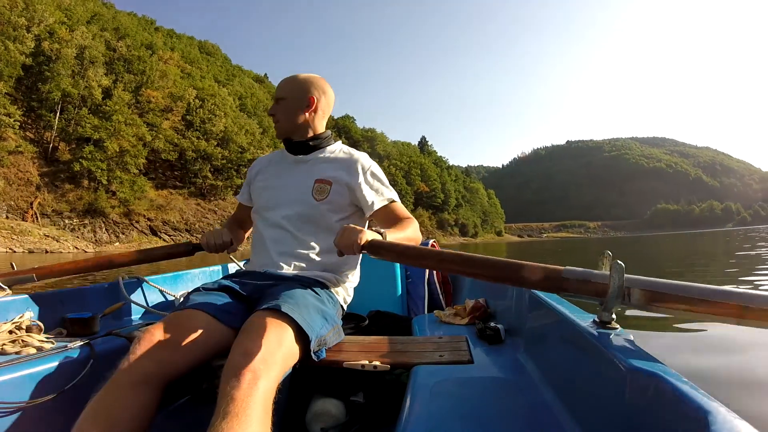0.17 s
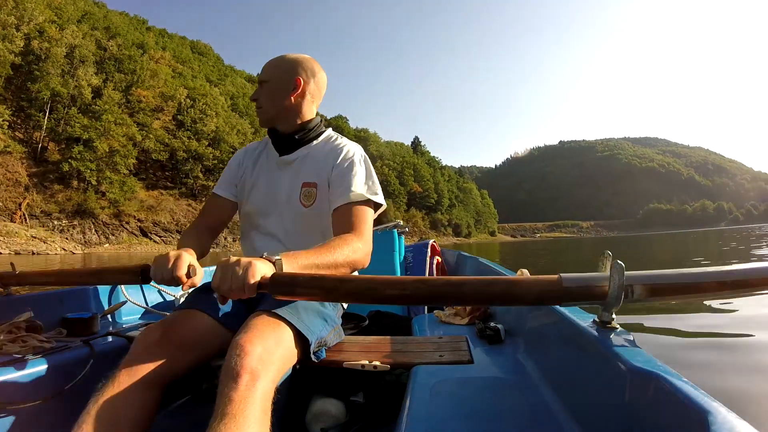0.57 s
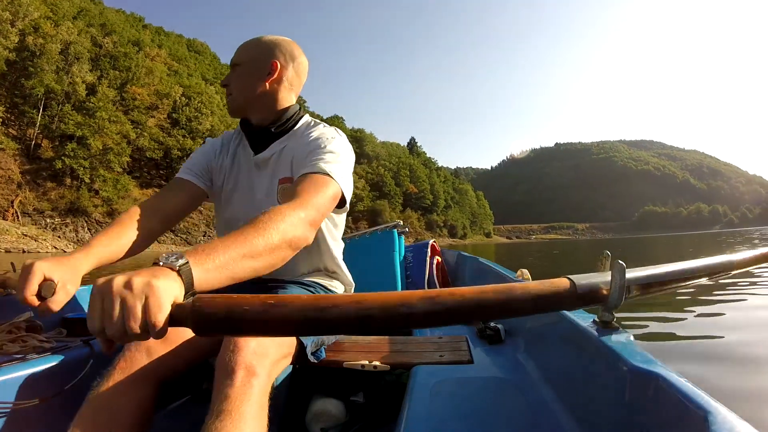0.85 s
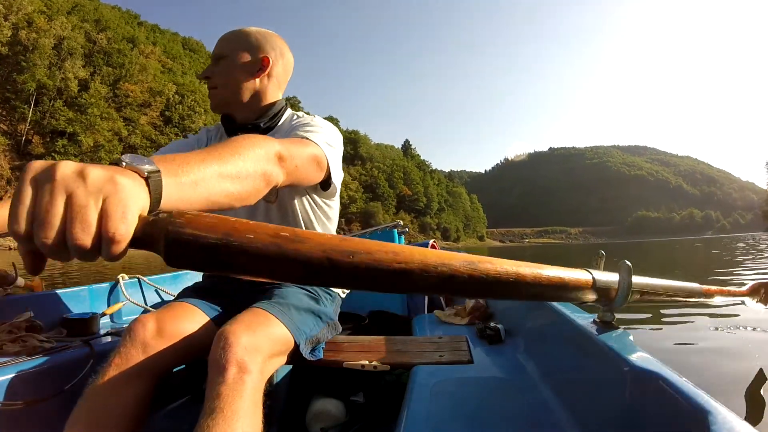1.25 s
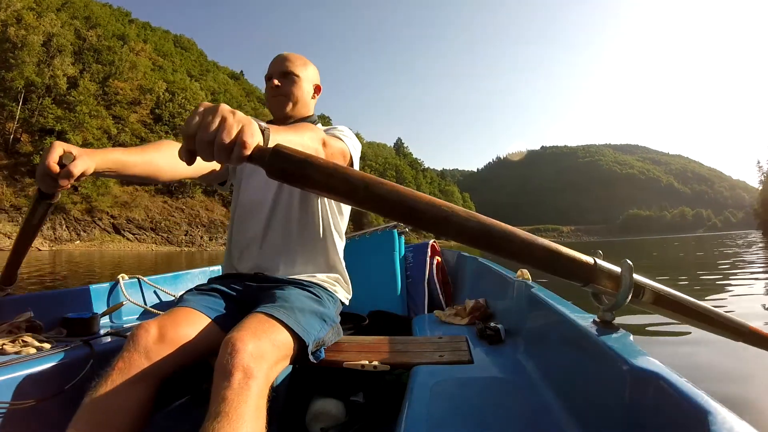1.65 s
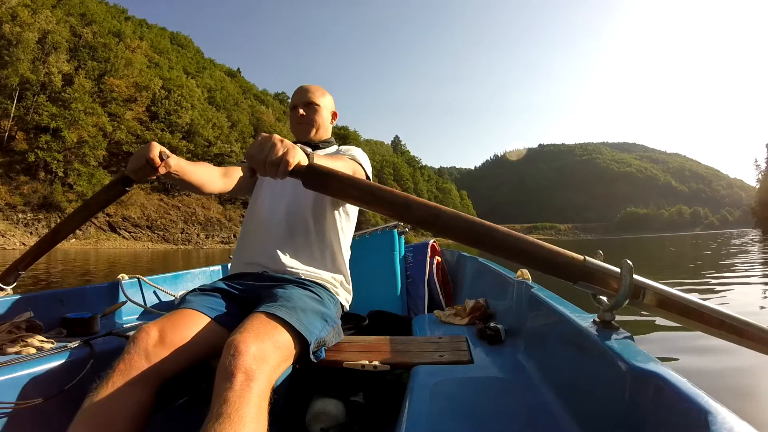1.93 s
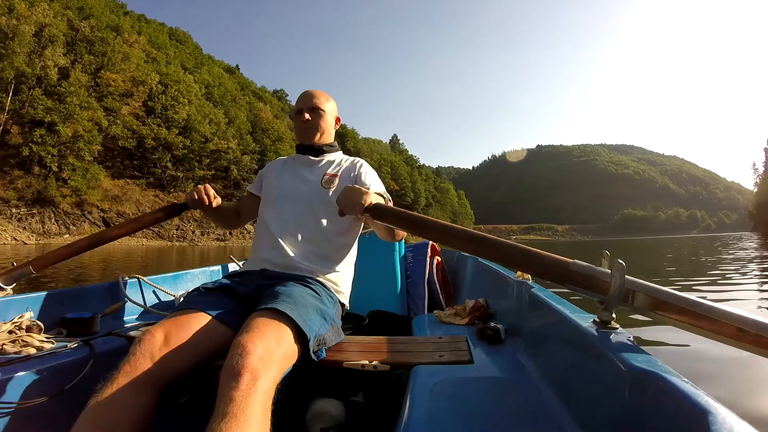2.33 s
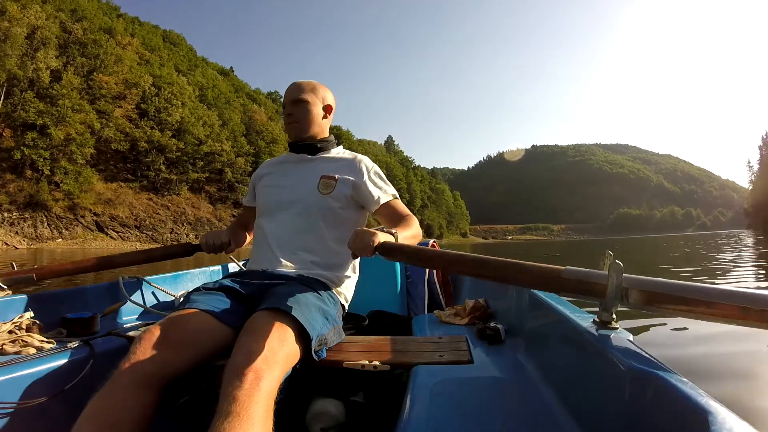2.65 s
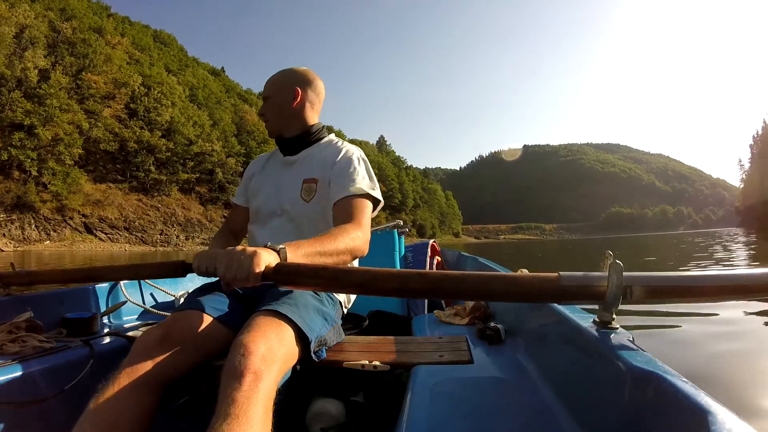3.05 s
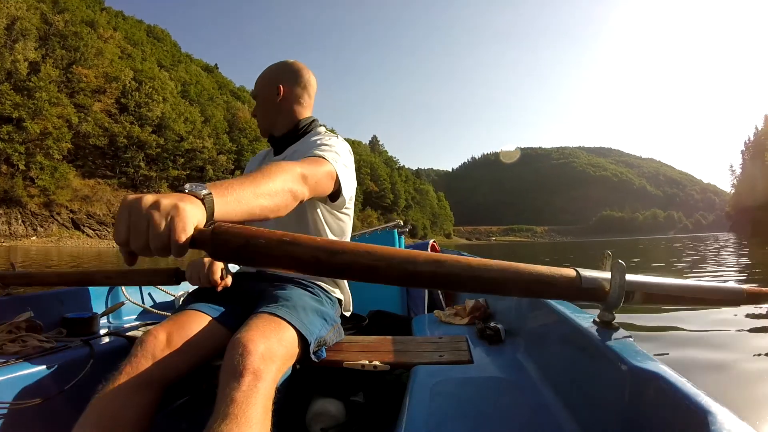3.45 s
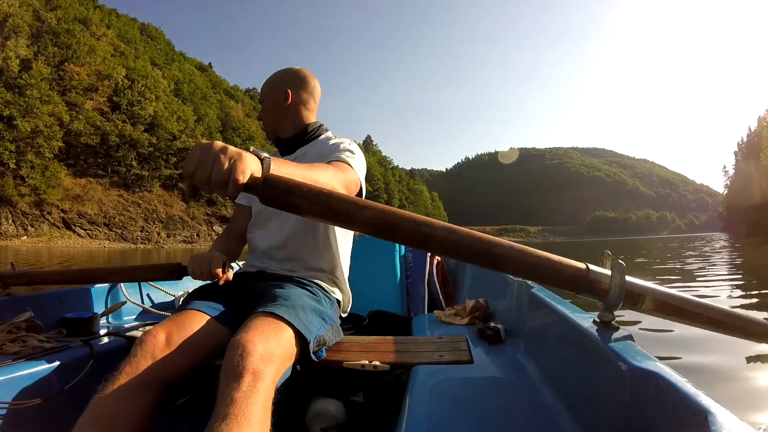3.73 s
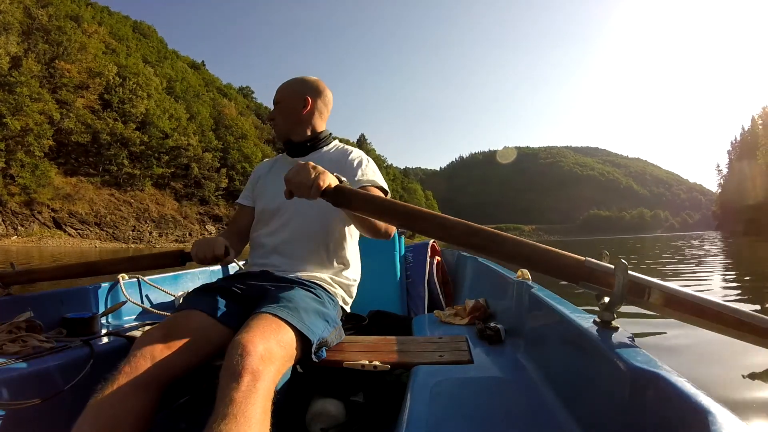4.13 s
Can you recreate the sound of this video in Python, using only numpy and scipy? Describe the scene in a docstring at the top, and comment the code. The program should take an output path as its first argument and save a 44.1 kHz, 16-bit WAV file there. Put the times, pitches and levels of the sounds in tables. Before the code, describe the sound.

Heard from inside a closed case fixed to a small boat on a calm lake: oars knock and rub in their rowlocks while bright drops fall. Knocks swell to heavy hollow thumps just before two seconds, a brief juddering groan follows, then blades swirl the water with bubbles and gulps. After a lull, softer knocks return with a few drops and a tiny metal squeak, over steady low rumble and faint hiss.

```python
"""Rowing a small dinghy on a calm lake, heard inside a closed case fixed to the hull.
Oars knock and rub in their rowlocks while drops fall; the knocks, which ring the hull modes, swell.
Just after 2 s the oar groans in stick-slip jolts, then the blades swirl: noise bands and bubbles.
After a lull, softer knocks return with drops and a faint metal squeak, a bent whistle.
The case's resonances colour all this, over a steady rumble and hiss."""
import sys
import numpy as np
from scipy import signal
from scipy.fft import rfft, irfft, next_fast_len
from scipy.io import wavfile
from scipy.ndimage import map_coordinates

SR = 44100
rng = np.random.default_rng(int(sys.argv[2]) if len(sys.argv) > 2 else 0)


def transcribe(signal):
    """Save signal, clipped to [-1, 1], as a 16-bit WAV file at the path in sys.argv[1]."""
    frames = np.atleast_2d(signal).T
    limited = np.clip(frames, -1, 1)
    pcm = np.round(limited * 32767).astype(np.int16)
    wavfile.write(sys.argv[1], SR, pcm)


N = 188764  # samples in the scene


def amp(db):
    """Gain of a level in dB."""
    return 10 ** (np.asarray(db) / 20)


def unit(x):
    """Scale to rms 1."""
    return x / np.sqrt(np.mean(x ** 2) + 1e-20)


def noise():
    """White noise for the whole scene."""
    return rng.standard_normal(N)


def along(points, hz):
    """Read a curve of (f/Hz, value) points on a log frequency axis."""
    f, value = np.transpose(points)
    return np.interp(np.log(hz + 1), np.log(f + 1), value)


def wobble(rate):
    """A smooth random curve with this many knots a second."""
    knots = rng.standard_normal(int(N * rate / SR) + 4)
    return map_coordinates(knots, [np.arange(N) * rate / SR])


def filtered(x, response):
    """Apply a complex response of frequency."""
    m = next_fast_len(N + SR // 2)
    spectrum = rfft(x, m) * response(np.fft.rfftfreq(m, 1 / SR))
    return irfft(spectrum, m)[..., :N]


def band(x, lo_hz, hi_hz):
    """A causal band-pass."""
    return signal.sosfilt(signal.butter(2, [lo_hz, hi_hz], "band", fs=SR, output="sos"), x)


def swells(start, end, peak_db, rise, fall, rest_db):
    """Level in dB: swells climb, hold and fall at steady dB/s; their powers add over a resting level."""
    t = np.arange(N)[:, None] / SR
    before, after = np.clip(start - t, 0, None), np.clip(t - end, 0, None)
    db = peak_db - rise * before - fall * after
    return 10 * np.log10(np.sum(amp(2 * db), axis=1) + amp(2 * rest_db))


# Ringing modes of the hull: f/Hz, relative level/dB, decay by 60 dB t60/s
HULL_MODES = [(44, -4, 0.16), (64.2, -16, 1), (93.9, 2, 0.21), (139.9, 0, .14), (172.6, -1, 0.14),
              (227.7, -2, 0.14), (280, 0.5, 0.12), (333.4, -3, 0.21), (376.3, -4, 0.14), (443.7, -1, 0.083),
              (512, -4.5, 0.13), (624, -13.5, 0.11), (678, -18, 0.26), (743.7, -2, 0.052),
              (828.8, -6, 0.15), (937.3, 1.5, 0.046), (1160, -17.5, 0.06)]


def hull(force, lo_hz, hi_hz):
    """The planks ring under a force in the modes of one range; neighbours start in opposite phase."""
    t = np.arange(SR // 3) / SR
    ring = np.zeros(len(t))
    for k, (hz, db, t60) in enumerate(HULL_MODES):
        if lo_hz <= hz < hi_hz:
            ring += (-1) ** k * amp(db - 60 * t / t60) * np.sin(2 * np.pi * hz * t)
    return signal.fftconvolve(force, ring / np.linalg.norm(ring))[:N]


# Oar knocks, levels before the final trim:
# t/s, boom level/dB, boom centre f/Hz, wood level/dB, crack level/dB
OAR_KNOCKS = [(0.004, -21.5, 162, -22.5, -62), (0.042, -35, 102, -31, -32),
              (0.094, -17.5, 168, -19.5, -39.5), (0.16, -30, 84, -22, -43), (0.251, -34, 150, -25, -62),
              (0.378, -41, 81, -28.5, -60), (0.75, -46, 60, -55, -75), (0.909, -27.5, 213, -35, -74),
              (0.947, -30, 298, -26, -50), (0.989, -33, 126, -35, -62), (1.096, -14, 280, -15.5, -42),
              (1.124, -17, 87.5, -29, -55), (1.162, -22.5, 173, -24.5, -42), (1.189, -22, 107, -33, -63),
              (1.448, -44, 126, -27, -77), (1.485, -34, 196, -29, -72), (1.699, -25.5, 122, -30.5, -46),
              (1.751, -20.5, 103, -23, -45), (1.778, -6.5, 246, -8.5, -20), (1.793, -5, 100, -17.5, -65),
              (1.86, -24, 119, -31, -25), (1.944, -25, 120, -34.5, -32), (2.074, -7, 228, -13.5, -29),
              (2.277, -51, 100, -19.5, -64), (2.289, -38, 297, -16, -28), (2.314, -19, 118, -15, -61),
              (2.336, -14.5, 152, -16, -25.5), (2.39, -24.5, 149, -52, -24.5), (2.419, -25, 88, -21, -48),
              (2.453, -12, 182, -24, -34), (2.489, -18.5, 83, -12, -38.5), (2.534, -17.5, 225, -34, -50),
              (2.613, -27, 280, -45, -43), (2.647, -17.5, 275, -25, -32), (2.7, -23.5, 200, -30, -37),
              (3.0, -57, 170, -35, -57), (3.051, -52, 70, -27, -49), (3.321, -28, 200, -40, -53),
              (3.344, -26, 116, -59, -72), (3.388, -19, 198, -36, -59), (3.412, -19.5, 111, -28.5, -48.5),
              (3.439, -26, 97, -33, -58), (3.488, -24, 88, -43, -55), (3.69, -58, 78, -35, -52),
              (3.9, -28, 182, -34.5, -70.5), (3.967, -35, 90, -26.5, -47), (3.995, -20, 270, -24, -44.5),
              (4.011, -18.5, 93, -43, -60), (4.035, -28.5, 91, -42, -50), (4.208, -14.5, 167, -22, -43.5),
              (4.247, -18, 95, -25, -57)]
BOOM_DB_PER_OCTAVE = 12.5  # fall of the low modes away from the boom centre
PLANK_DB = -3  # middle modes, against the mean of boom and wood


def knocks():
    """Each contact is a short rattle of blows: it rings the hull modes at new strengths and cracks."""
    out, t = np.zeros(N + SR), np.arange(SR // 3) / SR
    hz, db, t60 = np.transpose(HULL_MODES)[:, :, None]
    for s, boom_db, boom_hz, wood_db, crack_db in OAR_KNOCKS:
        rattle = np.abs(np.exp(-t[:1500] / 0.0037) * rng.standard_normal(1500) ** 3)
        # the place of the blow favours the low modes near one pitch
        low_db = boom_db - BOOM_DB_PER_OCTAVE * np.abs(np.log2(hz / boom_hz))
        middle_db = (low_db + wood_db) / 2 + PLANK_DB
        level_db = np.where(hz < 300, low_db, np.where(hz < 600, middle_db, wood_db))
        uneven_db = 2 * rng.standard_normal(hz.shape)
        swing = (-1) ** np.arange(len(hz))[:, None] * amp(level_db + db + uneven_db)
        onset = 1 - np.exp(-t * hz * 2.4)
        modes = swing * amp(-60 * t / t60) * np.sin(2 * np.pi * hz * t) * onset
        ring = np.sum(modes, axis=0)
        body = 1.5 * signal.fftconvolve(ring, rattle / np.sum(rattle))[:len(t)]
        # a hard, bright contact is over sooner than a dull one
        crack_t60 = np.clip(0.025 + 0.003 * (wood_db - crack_db), .015, .08)
        crack_envelope = amp(crack_db - 60 * t / crack_t60) * (1 - np.exp(-t / 0.0014))
        crack = 3.93 * band(rng.standard_normal(len(t)), 810, 3300) * crack_envelope
        out[round(s * SR):][:len(t)] += body + crack
    return out[:N]


# The loaded oar slipping in its rowlock: t/s, slip rate f/Hz, level/dB (boom drive before the mix)
OAR_SLIPS = [(2.093, 235, -11.5), (2.107, 182, -0.5), (2.112, 250, -41), (2.118, 239, -11),
             (2.127, 202, -9), (2.134, 172, -8), (2.15, 166, -10.5), (2.174, 195, -19.5), (2.179, 138, -42)]
GROAN_WOOD_DB, WOOD_DB_PER_S = -20, 60  # the ring of the wood swells: drive at the start, climb
BITE_DB, BITE_DB_PER_S = -7, -100  # the metal's bite fades: level at the start before trim, slope


def groan():
    """Stick and slip: one jolt a slip, uneven in time and size, booming in the hull, biting in the metal."""
    times, rates, levels = np.transpose(OAR_SLIPS)
    t = np.arange(N) / SR
    rate, db = np.interp(t, times, rates), np.interp(t, times, levels)
    since = t - times[0]
    uneven_rate = rate * (1 + .03 * wobble(150)) * (since > 0)
    slips = np.diff(np.floor(np.cumsum(uneven_rate) / SR + .8), prepend=0)
    jolts = slips * amp(1.5 * noise())
    # between slips the wood keeps scraping
    force = jolts * np.sqrt(SR / rate) + .18 * noise()
    load = (t > times[0] - .002) * (t < times[-1])
    boom = hull(load * amp(db) * force, 150, 600)
    wood = hull(load * amp(GROAN_WOOD_DB + WOOD_DB_PER_S * since) * force, 600, 1200)
    # every slip frees a puff of grit a few milliseconds long
    puff = signal.lfilter([1], [1, -np.exp(-1 / (0.0041 * SR))], jolts)
    # a few milliseconds of smoothing keep the bite from switching on and off abruptly
    fading = signal.lfilter([.006], [1, -.994], load * amp(BITE_DB + BITE_DB_PER_S * since))

    def bite_colour(hz):
        """Gritty colour, strongest from about 2 to 4 kHz."""
        points = [(900, -15.5), (1800, -7.5), (3500, -5.5), (7000, -21.5), (12000, -50.5)]
        return amp(along(points, hz))

    bite = 1.96 * fading * filtered(puff * noise(), bite_colour)
    return .5 * boom + .5 * wood + bite


# Turns of the oars in the rowlocks: t/s of peak, boom level/dB, plank level/dB
OAR_RUBS = [(0.01, -38, -52), (0.14, -35, -39.5), (0.26, -45, -49.5), (0.622, -59, -53.5),
            (0.962, -36, -41.5), (1.119, -29, -42.5), (1.491, -38.5, -50), (1.68, -41, -52),
            (1.841, -31.5, -39), (1.92, -40.5, -51), (1.99, -53, -46.5), (2.171, -28, -35),
            (2.25, -49, -34), (2.33, -27.5, -47), (2.57, -31.5, -39.5), (2.7, -40, -43.5), (3.0, -66, -55),
            (3.35, -42, -56), (3.459, -35.5, -50), (3.56, -57, -80), (3.78, -47, -58), (3.998, -34, -44),
            (4.13, -46, -69), (4.27, -56, -45)]
RUB_RISE_DB_PER_S, RUB_FALL_DB_PER_S = 262, 136
BOOM_REST_DB, PLANK_REST_DB = -65.5, -67


def rubbing():
    """Wood drags on metal in uneven lumps and the hull modes carry it."""
    s, boom_peak, plank_peak = np.transpose(OAR_RUBS)
    boom_db = swells(s, s, boom_peak, RUB_RISE_DB_PER_S, RUB_FALL_DB_PER_S, BOOM_REST_DB)
    plank_db = swells(s, s, plank_peak, RUB_RISE_DB_PER_S, RUB_FALL_DB_PER_S, PLANK_REST_DB)
    lumps = wobble(19)
    boom_drag = amp(3.5 * lumps + 2.5 * wobble(40)) * noise()
    plank_drag = amp(1.5 * lumps + 4.5 * wobble(60)) * noise()
    boom = unit(hull(boom_drag, 40, 250))
    plank = unit(hull(plank_drag, 250, 650))
    return amp(boom_db) * boom + amp(plank_db) * plank


def bubbles(s, db, hz, cycles, rise, size=600):
    """Damped sines whose pitch climbs as the bubble nears the surface."""
    t = np.arange(size) / SR
    turns = hz[:, None] * t
    life = turns / np.clip(cycles, 1, 40)
    envelope = np.exp(-life) * (1 - np.exp(-2 * turns))
    wave = np.sin(2 * np.pi * turns * (1 + rise * life)) * envelope
    at = np.round(s * SR).astype(int)[:, None] + np.arange(size)
    return np.bincount(at.ravel(), (amp(db)[:, None] * wave).ravel(), N + SR)[:N]


# Blades stirring the water: t/s of full flow, hold/s, stir level/dB
BLADE_SPLASHES = [(0.0, 0.28, -52), (0.376, 0.091, -60.5), (1.845, 0.05, -57.5), (2.273, 0.084, -44.5),
                  (2.38, 0.16, -44.5), (2.608, 0.23, -45.5), (3.053, 0.018, -53), (3.294, 0.012, -63.5),
                  (3.96, 0.014, -65), (4.266, .1, -66)]
STIR_RISE_DB_PER_S, STIR_FALL_DB_PER_S, STIR_REST_DB = 292, 77, -70
# level at rest in dB, before any band trim, and dB gained for each dB of stir
GURGLE_DB, GURGLE_GROWS, FIZZ_DB, FIZZ_GROWS = -64, 0.8, -56.5, 0.48
SPRAY_DB = -6.5  # a bright band of spray, against the stir level


def swirl(count=5000):
    """Stirred water: lumpy noise bands from gurgle to spray, with a swarm of small random bubbles."""
    s, hold, peak_db = np.transpose(BLADE_SPLASHES)
    stir_db = swells(s, s + hold, peak_db, STIR_RISE_DB_PER_S, STIR_FALL_DB_PER_S, STIR_REST_DB)
    gurgle_db = GURGLE_DB + GURGLE_GROWS * (stir_db - STIR_REST_DB)
    fizz_db = FIZZ_DB + FIZZ_GROWS * (stir_db - STIR_REST_DB)
    lumps = wobble(25.21)

    def flow(lump_db, flutter_db, rate, lo_hz, hi_hz):
        """Noise in one band, swelling with the shared lumps and its own flutter."""
        return unit(band(amp(lump_db * lumps + flutter_db * wobble(rate)) * noise(), lo_hz, hi_hz))

    gurgle = amp(gurgle_db) * flow(1, 2.86, 70, 601, 1110)
    swish = 0.83 * amp(stir_db) * flow(2, 1.9, 92, 1450, 3560)
    fizz = 0.57 * amp(fizz_db) * flow(1, 7.6, 300, 3100, 12500)
    spray = amp(stir_db + SPRAY_DB) * flow(2, 5.3, 200, 7060, 8040)
    when, pitch, size = rng.random((count, 3)).T
    hz = 1400 * 7 ** pitch
    at = (when * (N - 1)).astype(int)
    # bubbles grow louder with the lumps of the flow; few stand out
    flow_db = np.where(hz < 3500, stir_db[at] + 2, fizz_db[at])
    level_db = flow_db + 2 * lumps[at] + 15 * size ** 5
    swarm = 0.91 * bubbles(at / SR, level_db, hz, cycles=5.96, rise=0.044)
    return gurgle + swish + fizz + spray + swarm


# The clearest drops and bursting bubbles: t/s, level/dB, f/Hz
CLEAR_DROPS = [(0.0411, -27.5, 7160), (0.0498, -29, 3470), (0.089, -26, 7600), (0.1144, -27, 1460),
               (0.125, -20, 7460), (0.139, -29, 4300), (0.144, -20, 8600), (0.1673, -27, 7750),
               (0.1966, -28, 4240), (0.2014, -20, 7700), (0.2936, -30, 9130), (0.2932, -33.5, 2050),
               (0.3114, -31, 4200), (0.3774, -37, 2040), (0.4797, -31, 10940), (0.5794, -33, 2800),
               (1.181, -34, 8400), (1.553, -42, 1810), (1.5569, -33.5, 5030), (1.702, -42, 5300),
               (1.726, -39, 5470), (1.862, -37, 3030), (1.894, -35, 1700), (1.9488, -32, 2790),
               (2.2136, -31, 3120), (2.239, -29.5, 3880), (2.2605, -27, 1656), (2.264, -41, 6720),
               (2.2934, -22, 2273), (2.301, -33, 4130), (2.341, -18.5, 2840), (2.3736, -28, 7410),
               (2.3888, -32, 7410), (2.4265, -33, 2840), (2.444, -27, 2970), (2.4447, -26, 10100),
               (2.467, -24, 2550), (2.5071, -29, 4050), (2.5686, -19.5, 7740), (2.63, -24.5, 4060),
               (2.6332, -26.5, 7750), (2.64, -27, 2580), (2.6591, -29, 5100), (2.698, -24.5, 7040),
               (2.732, -27, 4130), (2.7383, -28, 6760), (2.777, -23, 7950), (2.836, -23, 7060),
               (2.836, -29, 2200), (2.846, -18, 7400), (2.8458, -20, 4220), (2.8908, -32, 2250),
               (3.062, -26, 8450), (3.098, -27, 10600), (2.923, -34, 4860), (2.906, -36, 9500),
               (0.1208, -28, 4470), (0.2189, -38, 7240), (0.2537, -33, 7490), (0.0925, -32, 5200),
               (0.1862, -34, 5940), (3.0745, -33.5, 2200), (3.3024, -28.5, 5560), (3.304, -35, 3400),
               (3.7307, -40.5, 2220), (3.832, -35, 6300), (4.0125, -32, 7410), (4.083, -38, 5440),
               (4.1438, -40.5, 2070)]
DROP_CYCLES, CYCLES_PER_OCTAVE = 5.24, 1.2  # life of a 2 kHz drop; higher drops ring for more cycles
TICK_DB = -6.5  # the click of a drop's impact, against its ring


def drips():
    """Each drop rings as a damped sine with a nearly steady pitch, under a one-cycle impact click."""
    s, db, hz = np.transpose(CLEAR_DROPS)
    life = DROP_CYCLES + CYCLES_PER_OCTAVE * np.log2(hz[:, None] / 2000)
    rings = bubbles(s, db, hz, life, rise=0.0061, size=1200)
    ticks = amp(TICK_DB) * bubbles(s, db, hz, cycles=1, rise=0, size=200)
    return rings + ticks


# Large bubbles rising from the blade:
# t/s, level/dB, first f/Hz, life/cycles, rise (half the relative climb of pitch in one life)
BLADE_GULPS = [(.043, -33, 823, 4.9, .02), (.1, -30.5, 410, 4.9, .05), (.155, -29, 631, 9, 0.38),
               (.377, -36, 724, 5.7, 0.021), (1.636, -43, 697, 18, .18), (2.315, -29.5, 426, 3.9, 0.039),
               (2.416, -38, 795, 8.6, 0.045), (2.488, -34, 746, 8.9, 0.12), (2.609, -26, 329, 3.6, 0.017),
               (2.645, -29, 337, 5.2, 0.028), (2.7, -31, 583, 5.6, 0.033), (2.712, -35, 235.7, 8.5, 0.053),
               (2.85, -34.5, 489, 4.1, 0.042), (3.129, -40.5, 1052, 10, 0.25)]


def gulps():
    """Large bubbles ring low and bend upwards as they rise."""
    s, db, hz, cycles, rise = np.transpose(BLADE_GULPS)
    return bubbles(s, db, hz, cycles[:, None], rise[:, None], size=4000)


# Dry metal squeaks: t/s, length/s, first f/Hz, last f/Hz, level/dB
PIN_SQUEAKS = [(3.974, .026, 5130, 5200, -33), (3.965, .035, 4300, 4250, -53), (4.05, .04, 5200, 5330, -51),
               (3.84, .03, 5550, 5500, -58)]


def squeaks():
    """A rough, bent whistle of the rowlock pin: a jittered sine and its octave."""
    t, out = np.arange(N) / SR, np.zeros(N)
    for s, length, first_hz, last_hz, db in PIN_SQUEAKS:
        done = np.clip((t - s) / length, 0, 1)
        glide = first_hz + (last_hz - first_hz) * done
        hz = glide * (1 + .015 * wobble(500))
        turn = 2 * np.pi * np.cumsum(hz) / SR
        tone = np.sin(turn) + 0.15 * np.sin(2 * turn)
        out += amp(db + 5.4 * wobble(250)) * np.sin(np.pi * done) * tone
    return out


# Colour of the background before its overall level is set: f/Hz, relative level per Hz/dB
CALM_COLOUR = [(12, -29), (20, 4.5), (92, 9), (382, -5.5), (491, -2.5), (746, -28), (857, 3.5),
               (1200, -13.5), (2030, -14), (2540, -18), (7950, -26.5), (14300, -37), (15500, -38)]


def calm():
    """The steady rumble and hiss of the microphone: coloured noise."""
    return amp(-53.0) * unit(filtered(noise(), lambda hz: amp(along(CALM_COLOUR, hz))))


def scene():
    """Oars, water and metal all reach one microphone."""
    oars = knocks() + groan() + rubbing()
    water = swirl() + drips() + gulps()
    return (oars + water + squeaks())[None]


# Colour of the closed case: f/Hz, gain level/dB
CASE_COLOUR = [(40, -3.5), (600, 4.5), (850, 5), (1050, 1), (1350, -10.5), (1750, -6), (2150, 0),
               (2700, -8), (3700, -14), (4250, -12.5), (5200, -11), (6300, -13.5), (7900, -16),
               (10000, -22)]


def case(hz):
    """Causal resonances of the case: minimum-phase colour from the folded cepstrum."""
    c = irfft(np.log(amp(along(CASE_COLOUR, hz))))
    c[1:len(c) // 2] *= 2
    c[len(c) // 2 + 1:] = 0
    return np.exp(rfft(c))


def softened(x, top=.9):
    """The input stage rounds off the highest peaks, never passing the top."""
    return x / (1 + np.abs(x / top) ** 4) ** (1 / 4)


TOP_HZ = 15650  # band limit


def record(dry):
    """The case colours, the input softens, the microphone adds its hiss and the band limit cuts the top."""
    heard = softened(filtered(dry, case)) + calm()
    return filtered(heard, lambda hz: hz < TOP_HZ)


dry = scene()
out = record(dry)
transcribe(out)
```